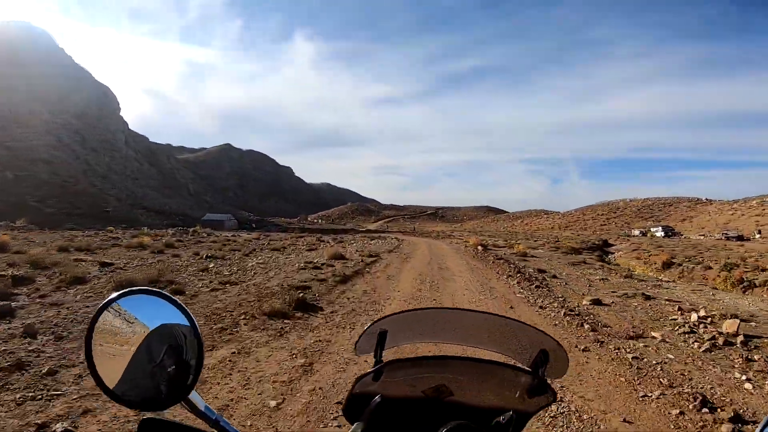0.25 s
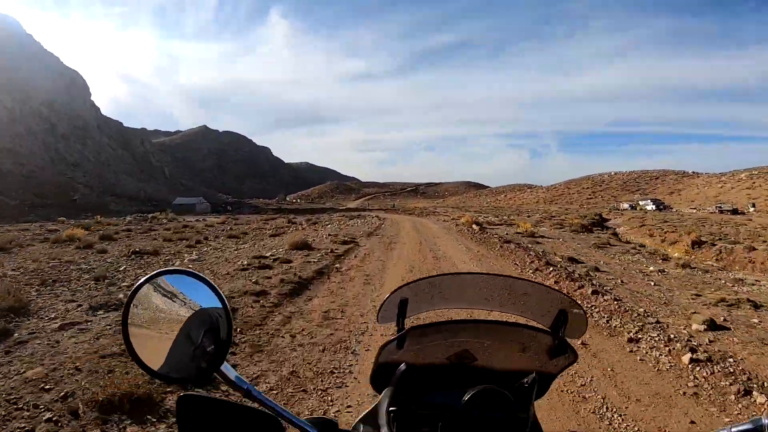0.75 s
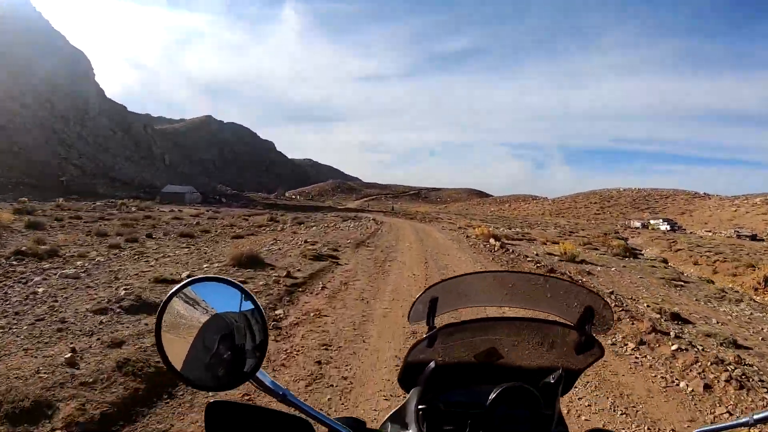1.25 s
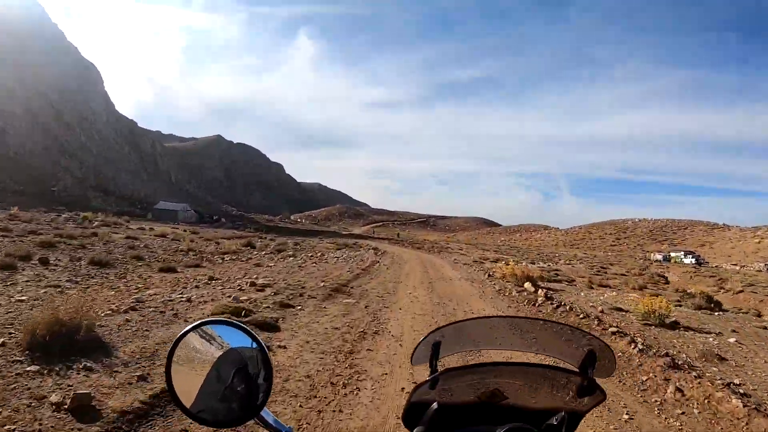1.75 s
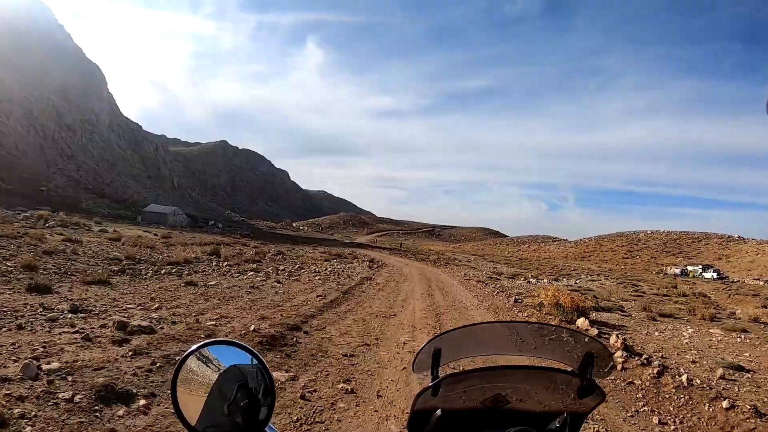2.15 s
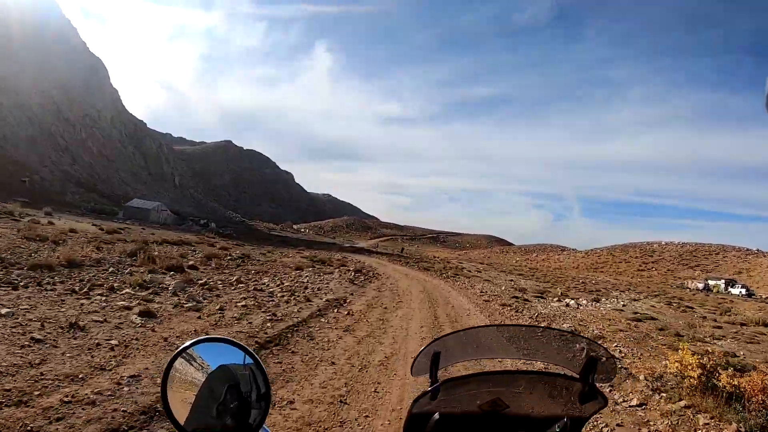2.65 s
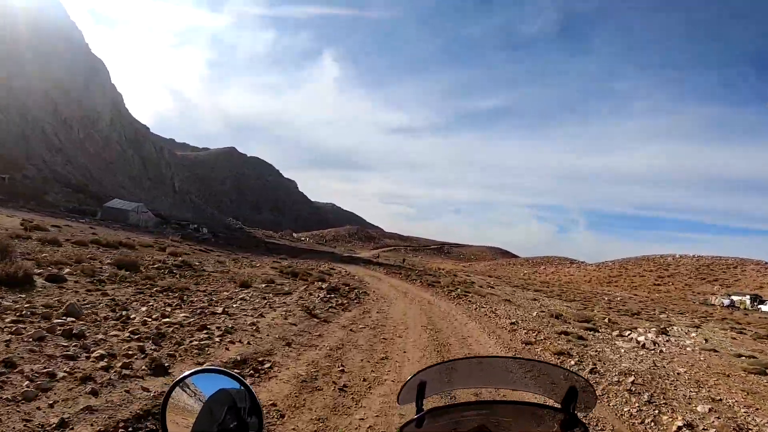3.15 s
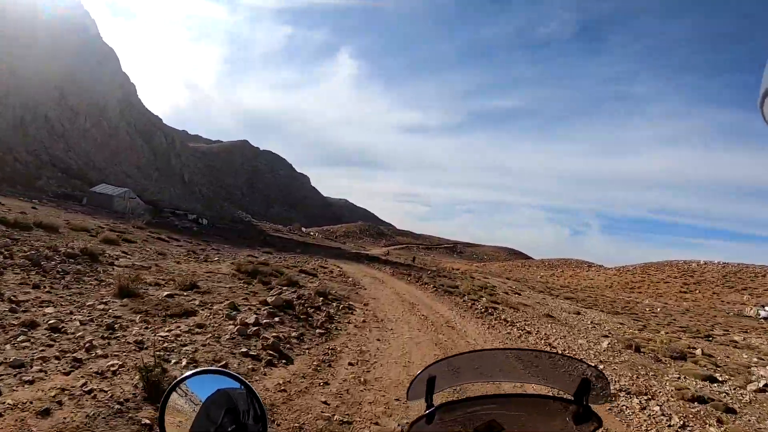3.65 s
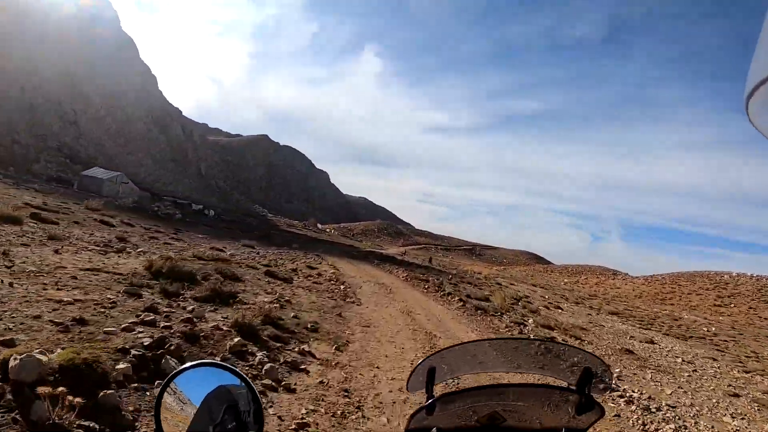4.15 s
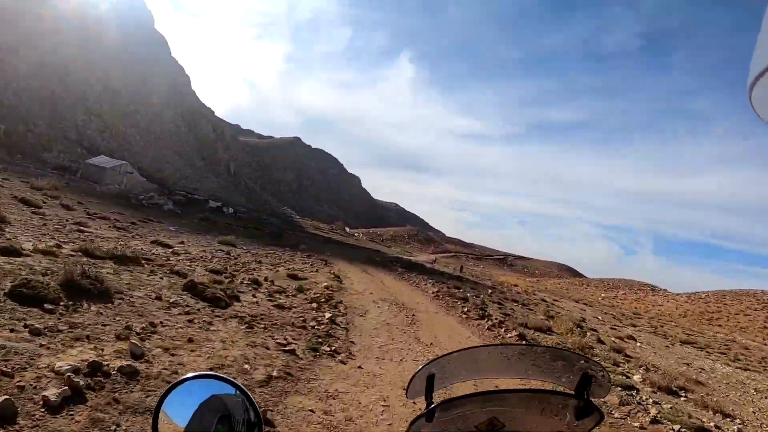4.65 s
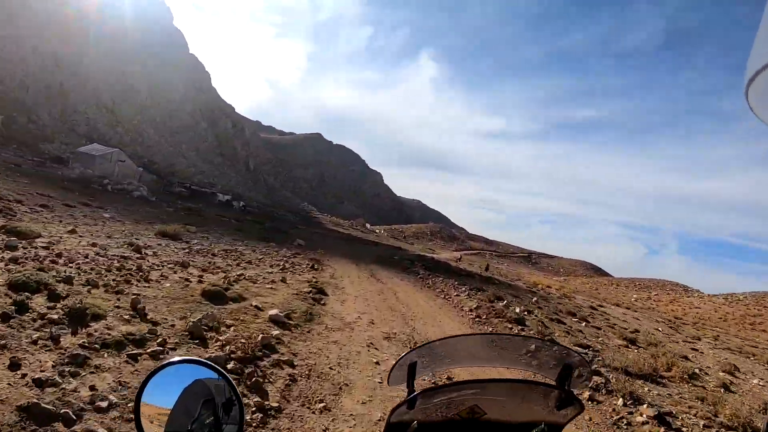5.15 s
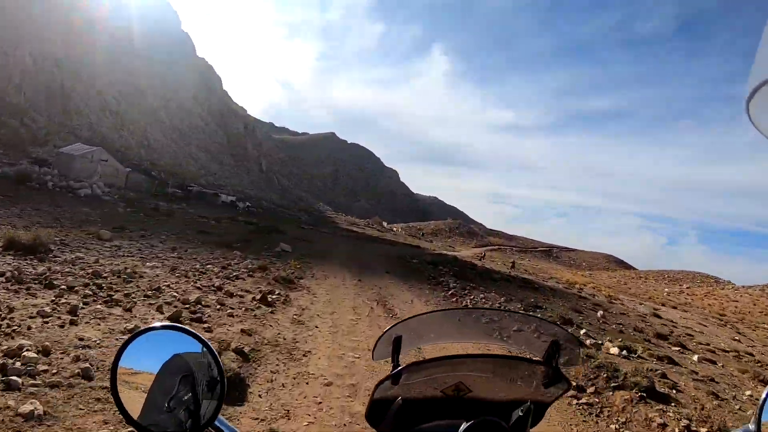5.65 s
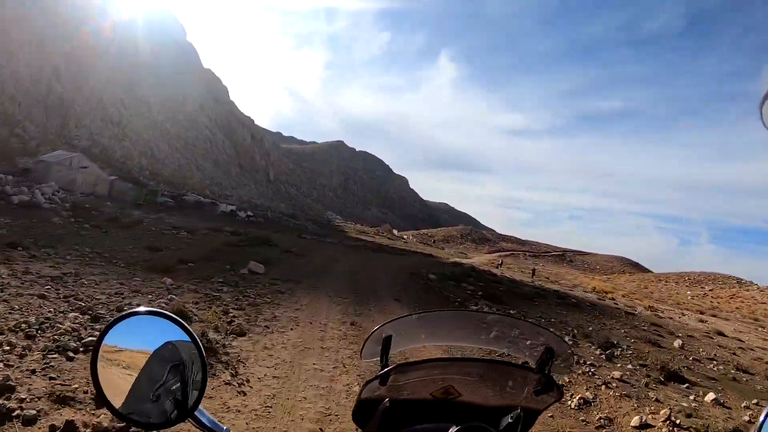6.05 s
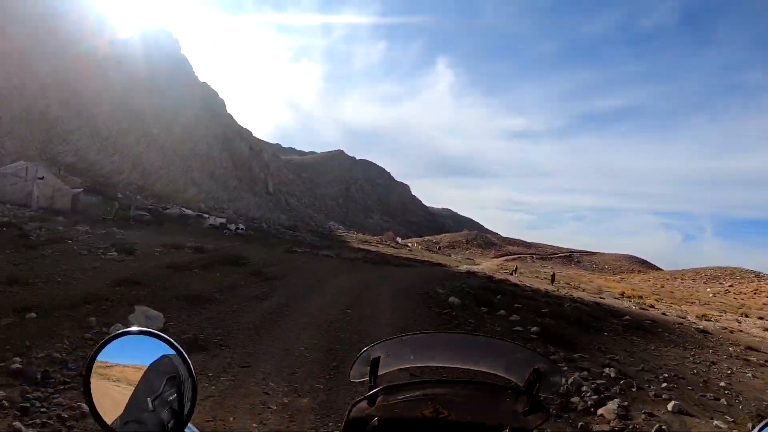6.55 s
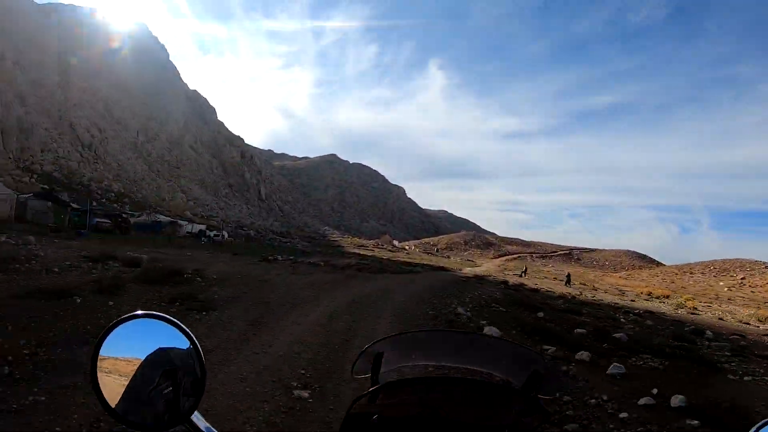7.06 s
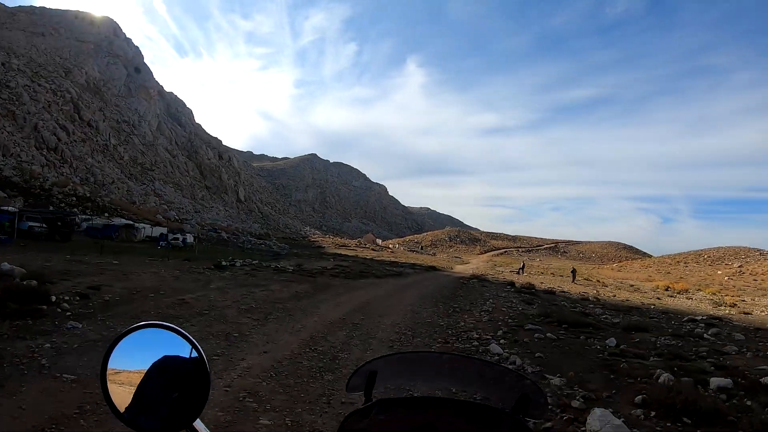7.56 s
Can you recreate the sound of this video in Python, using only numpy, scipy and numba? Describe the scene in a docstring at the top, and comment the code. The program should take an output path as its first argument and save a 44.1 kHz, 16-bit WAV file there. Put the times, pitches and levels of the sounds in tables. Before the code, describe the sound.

A motorcycle ridden on a rough stony track, heard from a microphone on the rider's body, dry and close in open air. Deep wind rumble and frame shudder run throughout, with faint gritty tyre hiss. From 0 to 0.5 s the engine drone drops in pitch, with a few dull ticks; from about 0.6 s throttle opens and the pitch climbs, growing a hoarse, pulsing exhaust bark, strongest around 2.2 s. Knocks begin near 1.3 s and cluster at 1.6 to 2.1. After 2.5 s the throttle closes and the engine falls to a low, steady throb by 3.1. A sharp bright crack hits at 3.0; hollow knocks, clicks and scraping clatter then crowd together, heaviest around 5.2 to 6.1 s. Rattling continues until 6.9, nearly clears around 7.0 to 7.3, leaving throb and small ticks, then returns in brief knocks at 7.4 to 7.7.

```python
"""Motorcycle on a stony track

A camera on a rider's chest as a motorcycle climbs a stony track in open country. The engine drones in
sine orders of its cycle, and each firing rings exhaust resonances. The camera mount knocks as damped swings,
among bright clicks and dull ticks; it clatters in bursts and longer stretches, dense grains over scraping noise.
Coloured noise makes the tyre hiss and the deep rumble of wind and frame shudder."""
import sys
import numpy as np
from scipy import signal
from scipy.fft import rfft, irfft, next_fast_len
from scipy.io import wavfile
from scipy.ndimage import uniform_filter1d
from numba import njit

SR = 44100
rng = np.random.default_rng(int(sys.argv[2]) if len(sys.argv) > 2 else 0)


def invert_db(level):
    """Linear amplitude ratio for a level in decibels (20 dB per decade), elementwise."""
    return 10 ** (np.asarray(level, dtype=float) / 20)


def unload_wav(signal):
    """Save mono or channel-first audio to the path in sys.argv[1] as 16-bit WAV at rate SR, clipped to [-1, 1]."""
    wavfile.write(
        sys.argv[1],
        SR,
        np.round(np.clip(np.atleast_2d(signal).T, -1, 1) * 32767).astype(np.int16),
    )


N = 344421
T = np.arange(N) / SR


def level(x, db):
    """Mean-square scaling: brings a signal to an rms level in dB."""
    return x * invert_db(db) / np.sqrt(np.mean(x ** 2))


def curves(table):
    """Linear interpolation: table columns against time, sample by sample."""
    s, *columns = np.transpose(table)
    return [np.interp(T, s, c) for c in columns]


def colour(x, points):
    """Minimum-phase filtering: a causal response to (Hz, dB) points, from the folded cepstrum."""
    size = next_fast_len(2 * SR)
    hz, db = np.transpose(points)
    f = np.maximum(np.arange(size // 2 + 1) * SR / size, 1)
    log_gain = np.interp(np.log(f), np.log(hz), db) * np.log(10) / 20
    cepstrum = irfft(log_gain, size)
    cepstrum[1:size // 2] *= 2
    cepstrum[size // 2 + 1:] = 0
    impulse = irfft(np.exp(rfft(cepstrum)), size)[:SR // 2]
    return signal.fftconvolve(x, impulse)[:N]


def ring(x, hz, width):
    """Resonance: a second-order band-pass with gain 1 at its centre."""
    return signal.lfilter(*signal.iirpeak(hz, hz / width, SR), x)


def lowpass(x, hz):
    """Steep low-pass: a third-order Butterworth response."""
    return signal.sosfilt(signal.butter(3, hz, fs=SR, output="sos"), x)


def walk(rate):
    """Slow random modulation: levels held 1 / rate seconds, slewed twice, with a spread of 1."""
    k = int(SR / rate)
    held = np.repeat(rng.standard_normal(N // k + 1), k)
    w = uniform_filter1d(uniform_filter1d(held, k), k)[:N]
    return w / w.std()


@njit
def grains(s, hz, cycles, size):
    """Damped free oscillation: swings that open with a pull on the diaphragm as the contact builds."""
    y = np.zeros(N)
    for e in range(len(s)):
        p = np.exp((2j * np.pi - 3 / cycles[e]) * hz[e] / SR)  # one sample of turning and decay
        z, gap, i = size[e] + 0j, 1., int(s[e] * SR)
        for k in range(i, min(N, i + int(2.5 * cycles[e] * SR / hz[e]))):
            y[k] -= z.imag * (1 - gap)
            z *= p
            gap *= np.exp(-9 * hz[e] / SR)  # the contact closes within a part of a swing
    return y


def engine():
    """Periodic excitation: steady low orders of the cycle, and one firing a cycle that excites resonances."""
    # Each row: time in seconds, engine cycle rate in Hz, 4th order in dB, 6th order in dB,
    # throttle as the nominal level of the exhaust bark in dB.
    revs = [(0, 24.3, -21, -32, -54), (.2, 21.7, -20, -40, -54), (.43, 17.1, -26, -29, -54),
            (.6, 17.2, -25, -25, -46), (.8, 18.3, -22, -21, -40), (1.05, 19.4, -22, -27, -39),
            (1.5, 21.95, -24, -32, -42), (1.85, 23.6, -29, -42, -37), (2.25, 24.9, -28, -44, -34),
            (2.42, 24.8, -26, -46, -38), (2.52, 24.9, -25, -46, -41), (2.76, 24.8, -26, -46, -50),
            (3.09, 18.6, -24, -46, -54), (3.4, 18.7, -24, -46, -54), (4.5, 17.8, -26, -40, -54),
            (5.15, 17.3, -28, -36, -54), (6.2, 16.9, -26, -31, -54), (6.85, 17.1, -30, -29, -53),
            (7.2, 17.3, -21, -27, -50), (7.81, 17.6, -32, -32, -52)]
    hz, db4, db6, bark_db = curves(revs)
    turn = np.cumsum(hz) / SR
    pull_db = np.minimum(bark_db + 44, 0)  # 0 under throttle, negative off it

    firing_s = 2.246  # a moment at which the exhaust fires
    cycle, phase = np.divmod(turn - turn[int(firing_s * SR)], 1)
    fired = np.flatnonzero(np.diff(cycle))
    strength_db = 1.3 * rng.standard_normal(len(fired))
    size = invert_db(strength_db[np.clip(cycle - cycle[0] - 1, 0, None).astype(int)])
    pulse = (np.exp(-phase / 0.3) + 0.25) * np.minimum(phase / 0.06, 1)
    puff = size * pulse * rng.standard_normal(N)

    bark = exhaust(hz, fired, puff, bark_db)
    # under load each firing also makes the mount tick
    tick = lowpass(ring(puff, 2400., 2000.), 4500.)
    return (drone(hz, turn, db4, db6, pull_db) + invert_db(bark_db) * level(bark, 0.27)
            + invert_db(pull_db) * level(tick, -56) + frame(hz, puff, pull_db))


def drone(hz, turn, db4, db6, pull_db):
    """Harmonic synthesis: sines at multiples of the cycle rate, wavering in level and phase."""
    # Orders that throttle brings out. Each row: multiple of the cycle rate,
    # level in dB under throttle at 20 cycles a second.
    orders = [(1, -17), (3, -31), (5, -29), (9, -32)]
    lines = [(4, db4), (6, db6)]
    for k, db in orders:
        lines.append((k, pull_db + db - abs(k - 4) * abs(hz - 20) / 2))
    total = 0
    for k, db in lines:
        gain = np.sqrt(2) * invert_db(db + walk(6))
        total = total + gain * np.sin(2 * np.pi * (k * turn + 0.025 * walk(5) + rng.random()))
    return total


def exhaust(hz, fired, puff, bark_db):
    """Pipe resonance: each firing starts a ring at each mode, and puffs of gas noise excite it too."""
    # Each row: resonance in Hz at 22 cycles a second, width in Hz, relative level in dB before the throttle tilt.
    pipe = [(470, 42, 3.5), (555, 60, 3.5), (680, 70, -11)]
    scatter, rise = 0.03, 0.005  # pitch spread as a share; pitch rise as a share per cycle a second
    bark = 0
    for f, width, db in pipe:
        pitch = f * (1 + scatter * rng.standard_normal(len(fired)) + rise * (hz[fired] - 22))
        chance = rng.standard_normal(len(fired))  # sets both delay and strength
        starts = fired / SR + 0.002 * np.abs(chance)
        rings = grains(starts, pitch, 3 * pitch / (np.pi * width), invert_db(1.6 * chance))
        gas = ring(ring(puff, f, 2 * width), f, 2 * width)
        # more throttle brings out the higher resonances
        tilt_db = 0.8 * (bark_db + 37.5) * min(np.log2(f / pipe[0][0]), 0.3)
        bark = bark + invert_db(db + tilt_db) * (level(ring(rings, f, 3 * width), -4) + level(gas, -2))
    return bark


def frame(hz, puff, pull_db):
    """Forced resonance: a frame part rings once a cycle, most at low revs."""
    part_hz, width_hz, loss_db = 1110, 130, 1.0  # loss per cycle a second above 14
    part = level(ring(ring(puff, part_hz, width_hz), part_hz, 2 * width_hz), -46)
    return invert_db(pull_db / 2 - loss_db * (hz - 14)) * part


def knocks():
    """Impact response: each blow swings and rings the housing, with a duller thud, bright edge and prior jolt."""
    # Knocks of the mount. Each row: time in seconds, nominal peak in dB, pitch in Hz,
    # bright edge in dB and thud in dB, both nominal against the peak.
    hits = [(1.307, -16.5, 810, -33, 0), (1.56, -16, 1060, -22, -5.5), (1.659, -12, 813, -26, -10),
            (1.774, -12, 1140, -5, -10), (2.076, -13.5, 915, -29, -11.5), (2.25, -16.5, 700, -23, -12),
            (2.601, -18, 1083, -40, -8), (2.805, -20, 886, -18.5, -7), (2.9, -16.5, 877, -27, 1),
            (2.926, -10, 995, -32, -1), (2.962, -22.5, 1060, -23, -4.5), (2.987, -8.5, 1670, 2.5, -7),
            (3.06, -21, 795, -6.5, -9.5), (3.308, -10, 923, -20.5, -6), (3.353, -15.5, 850, -17, -11),
            (3.374, -10.5, 788, -23.5, -21.5), (3.469, -19, 1100, -6.5, -4), (3.5, -15.5, 930, -29.5, -8.5),
            (3.595, -13.5, 995, -27, -6.5), (3.628, -18, 1090, -6, -7), (3.94, -25.5, 970, -11.5, -14),
            (3.957, -13, 1300, -27, -7.5), (4.031, -14.5, 1100, -37, -8.5), (4.124, -18.5, 923, -12, -4.5),
            (4.15, -16.5, 980, -31, -17), (4.265, -17.5, 860, -12.5, -5), (4.409, -16, 1044, -29, -14),
            (4.466, -18, 1030, -12.5, -5), (4.538, -11, 890, -29.5, -12), (4.604, -19, 890, -22, -2.5),
            (4.806, -21.5, 1100, -12.5, -8.5), (4.819, -13.5, 1470, -22, -6), (4.892, -19, 920, -28, -10.5),
            (5.015, -9.5, 833, -36, -18), (5.118, -11, 995, -22.5, -10.5), (5.233, -10, 1224, -26, -6),
            (5.271, -20, 1010, -21, 0.5), (5.284, -20.5, 1170, -4.5, -3), (5.313, -9, 1230, -24, -4.5),
            (5.368, -15, 1090, -30, -8.5), (5.441, -13.5, 1170, -1, -7.5), (5.479, -22, 1930, -3, 2),
            (5.497, -11.5, 1244, -19.5, -14), (5.565, -20, 1060, -18.5, -7), (5.62, -20.5, 970, -25, -6),
            (5.648, -16, 847, -24, -17), (5.694, -9.5, 1120, -34, -7), (5.794, -24, 1014, -18.5, -6.5),
            (5.832, -13, 802, -14, -15), (5.859, -14, 1150, -9, -11), (5.963, -19, 1340, -21.5, -7),
            (6.039, -11, 1920, -1, -12), (6.097, -22, 990, -4, -2), (6.269, -22, 1090, -8.5, -15),
            (6.423, -21.5, 996, -2.5, -9), (6.527, -14, 1090, -9, -10), (6.746, -15.5, 915, -28, -5),
            (6.878, -10.5, 1120, -33, -11), (6.94, -18.5, 910, -7.5, -16), (7.325, -22.5, 1150, -33, -28),
            (7.433, -22, 1180, -32, -21.5), (7.554, -18.5, 883, -24, -6), (7.569, -15.5, 825, -25.5, -11),
            (7.714, -16.5, 890, -14, -5.5)]
    s, db, hz, edge_db, thud_db = np.transpose(hits)
    e = rng.random((len(s), 4))
    swing = lowpass(grains(s, hz, 2.07 + 0 * s, invert_db(db + 4.0)), 3000.)
    tail = grains(s, hz * (0.74 + 1.03 * e[:, 2]), 7 + 0 * s, invert_db(db - 8.0))
    thud = grains(s, 250 + 300 * e[:, 0], 4.4 + 0 * s, invert_db(db + thud_db + 5.5))
    edge = grains(s, 2500 + 3500 * e[:, 1], 18.7 + 0 * s, invert_db(db + edge_db - 3.5))
    # the jolt that causes the blow starts 12 ms ahead of it
    jolt = grains(s - 0.012, 30 + 40 * e[:, 3], 0.59 + 0 * s, invert_db(db + 13.0))
    return swing + edge + lowpass(tail + thud + jolt, 3000.)


def clatter():
    """Stochastic impacts: dense ticks of the loose mount, each with its own pitch, scaled by the shaking."""
    shake_db, treble_db = shaking()
    shake = invert_db(shake_db)
    e = rng.random((18000, 4))
    # every contact rings three parts at once
    s = np.repeat(e[::3, 0], 3) * N / SR
    hz = 170 * (13000 / 170) ** e[:, 1]
    strength = invert_db(-3.0 * np.log(e[:, 2] + 0.026))
    ticks = grains(s, hz, 1 + 6.5 * e[:, 3] ** 2, strength * hz)
    # each contact chatters on through the housing for a moment, dying away over 1.7 ms
    blows = np.bincount((s * SR).astype(int), strength, N)
    chatter = rng.standard_normal(N) * signal.lfilter([1], [1, -np.exp(-1 / (0.0017 * SR))], blows)
    ticks = level(ticks, -1.5) + level(chatter, -4.0)
    # the ticks come in clumps, over a scraping noise that swells on its own
    clumps = level(ticks * invert_db(4.3 * np.minimum(walk(120), 1.5)), 0)
    scrape = rng.standard_normal(N) * invert_db(4.3 * np.minimum(walk(70), 1))
    # Spectrum of the mount. Each row: frequency in Hz, relative density in dB per Hz before the band split.
    spectrum = [(88, -20.5), (170, -1), (440, -10), (632, -12.5), (1600, -18.5), (2460, -22), (4000, -25),
                (6010, -36.5), (8370, -39.5), (15600, -51)]
    body = colour(clumps + level(scrape, -10.5), spectrum)
    low = signal.sosfilt(signal.butter(2, 1100., fs=SR, output="sos"), body)
    high = level(body - low, 8.94)
    treble = signal.sosfilt(signal.butter(3, 5500., "high", fs=SR, output="sos"), high)
    bright = shake * (high + (invert_db(treble_db) - 1) * treble)
    # the treble sizzles on around each burst; half a length of offset sets it apart from the ticks
    smooth_shake = uniform_filter1d(uniform_filter1d(shake, SR // 10), SR // 10)
    sizzle = smooth_shake * invert_db(-4.0) * np.roll(treble, N // 2)
    # light shaking is duller: the lows fade less than the highs
    return bright + sizzle + invert_db(0.76 * shake_db) * level(low, 4.66)


def shaking():
    """Exponential growth and decay: bursts add in power; their power-weighted mean sets the treble."""
    # Bursts and longer stretches of clatter. Each row: time in seconds, shaking in dB,
    # time to fall by die_away_db in seconds, treble in dB against the shaking.
    bursts = [(.03, -47.5, 0.094, -4), (1.1, -51, 0.54, 2), (1.506, -42, 0.06, 0), (1.676, -37, 0.089, 1.5),
              (1.799, -42.5, 0.14, -0.5), (1.938, -39.5, 0.042, 0.5), (2.083, -41, 0.056, -3.5),
              (2.598, -44, 0.024, -3), (2.8, -39.5, 0.14, 4), (2.909, -34.5, 0.051, 2),
              (2.995, -28, 0.049, 4), (3.183, -40, 0.039, 2.5), (3.318, -34, 0.034, -2),
              (3.369, -29, 0.033, 1.5), (3.508, -44, 0.13, -3.5), (3.6, -28, 0.017, -4),
              (3.638, -33, 0.046, 0), (3.876, -46, 0.027, -1), (3.951, -37.5, 0.054, 2),
              (4.037, -37, 0.019, -6.5), (4.115, -40, 0.059, 2), (4.161, -41.5, 0.05, 1),
              (4.27, -44, 0.053, -1), (4.405, -41.5, 0.094, -1.5), (4.553, -37.5, 0.079, 0),
              (4.62, -44, 0.099, -8), (4.767, -35.5, 0.013, 1), (4.837, -39, 0.091, -3),
              (5.019, -37, 0.035, -3.5), (5.126, -39.5, 0.087, -3), (5.244, -30.5, 0.028, -4.5),
              (5.289, -30, 0.031, 4.5), (5.309, -26, 0.028, 3), (5.443, -35.5, 0.019, -3.5),
              (5.491, -40, 0.19, 0.5), (5.641, -32.5, 0.017, 0), (5.707, -28, 0.038, 1),
              (5.815, -32, 0.038, -2), (5.88, -35, 0.06, 3), (5.908, -39.5, 0.013, 0),
              (5.973, -40, 0.047, 1), (6.046, -32.5, 0.035, 4), (6.136, -37.5, 0.049, 0),
              (6.29, -39.5, 0.041, 0), (6.457, -32.5, 0.046, -3.5), (6.532, -38, .04, 1),
              (6.575, -35, 0.0093, -3), (6.671, -41, 0.085, -1.5), (6.753, -36.5, 0.053, 1),
              (6.888, -41, 0.11, 2.5), (7.015, -50, 0.02, -2), (7.586, -35, 0.068, 4.5),
              (7.762, -38, 0.078, 1)]
    rest_db, die_away_db = -61.5, 20  # resting tremor; fall that counts as dying away
    rise_share = 0.83  # build-up time as a share of the dying time
    power, bright = invert_db(2 * rest_db), 0
    for s, db, fall_s, treble_db in bursts:
        away = np.where(T < s, (s - T) / rise_share, T - s) / fall_s
        burst = invert_db(2 * np.maximum(db - die_away_db * away, -120))
        power = power + burst
        bright = bright + burst * treble_db
    return 10 * np.log10(power), bright / power


def clicks():
    """Two-mode impact: each click, of a buckle or thrown grit, rings at its pitch and at a higher one."""
    # Each row: time in seconds, nominal peak in dB, pitch in Hz.
    bright_clicks = [(1.6616, -21, 4660), (1.6859, -20.5, 2650), (1.7007, -18.5, 2810),
                     (1.797, -21.5, 2820), (2.084, -29, 2890), (2.793, -21, 2930), (2.816, -19, 3150),
                     (2.885, -21, 2820), (2.9065, -30, 2470), (2.9865, -8.5, 3650), (3.301, -26, 2950),
                     (3.3285, -21.5, 2840), (3.354, -17, 2960), (3.3735, -17.5, 2830), (3.5903, -26, 3600),
                     (3.6273, -23, 3060), (3.729, -22.5, 2760), (3.4205, -31.5, 2800),
                     (3.5133, -28.5, 2710), (3.5995, -23, 2600), (3.645, -24.5, 2600),
                     (4.1496, -26.5, 2570), (4.4, -28.5, 2900), (4.475, -25, 2490), (4.5667, -21.5, 2930),
                     (4.806, -27, 2820), (4.822, -20.5, 2720), (4.8665, -20.5, 2450), (5.0152, -26.5, 3140),
                     (5.0336, -20.5, 3170), (5.1157, -24, 2660), (5.23, -23, 2450), (5.2862, -20, 2950),
                     (5.3105, -15.5, 2820), (5.4395, -26, 3000), (5.4782, -22, 3600), (5.2418, -26.5, 3540),
                     (5.805, -25, 4020), (5.8677, -21.5, 3370), (5.892, -16, 3840), (5.9983, -29, 2800),
                     (6.0307, -27.5, 2660), (6.039, -16.5, 3750), (6.048, -15, 3700), (6.145, -26.5, 2160),
                     (6.2015, -25, 2960), (6.2899, -34, 4200), (6.446, -19, 2700), (6.525, -27, 3080),
                     (6.5727, -20, 3050), (6.6757, -16.5, 2780), (6.746, -23, 2930), (6.791, -25.5, 2850),
                     (7.011, -29, 2570), (7.5797, -24, 2880), (7.727, -22, 2840), (7.7685, -22, 3220)]
    s, db, hz = np.transpose(bright_clicks)
    upper_hz = hz * (1.1 + 2.1 * rng.random(len(s)))
    lower = grains(s, hz, 5.1 + 0 * s, invert_db(db + 3.5))
    upper = grains(s, upper_hz, 11.0 + 0 * s, invert_db(db - 31.0))
    return lower + upper


def dull_ticks():
    """Heavy damping: short dull ticks at listed times, some in step with the engine's firings, others at random."""
    # Each row: time in seconds, nominal peak in dB.
    tick_times = [(0.063, -24), (0.184, -24.5), (0.235, -25), (0.295, -25.5), (0.693, -30.5), (1.044, -22),
                  (1.096, -21.5), (1.147, -24), (2.125, -24), (2.518, -24.5), (2.553, -25.5),
                  (2.676, -28.5), (2.848, -27), (3.106, -26.5), (4.759, -26), (4.932, -27), (5.378, -24),
                  (5.542, -22), (5.764, -20.5), (5.945, -25.5), (6.212, -30.5), (6.979, -34.5),
                  (7.015, -25.5), (7.021, -22.5), (7.151, -28.5), (7.179, -36), (7.223, -33)]
    strays_per_s, weakest_db, range_db = 5.7, -30.5, 13.0  # of the random ticks, before the low-pass
    e = rng.random((int(strays_per_s * N / SR), 3))
    stray_db = weakest_db + range_db * e[:, 2]
    stray = grains(e[:, 0] * N / SR, 800 + 900 * e[:, 1], 1.8 + 0 * e[:, 1], invert_db(stray_db))
    s, db = np.transpose(tick_times)
    listed = grains(s, 900 + 500 * rng.random(len(s)), 2.56 + 0 * s, invert_db(db + 7.0))
    return lowpass(stray + listed, 2600.)


def tyres():
    """Rolling noise: coloured hiss, its level modulated as grit crunches under the tread."""
    # Each row: frequency in Hz, relative density in dB per Hz.
    spectrum = [(90, -12.5), (170, -1.5), (230, -9), (320, -14.5), (530, -10.5), (860, -13), (1100, -11.5),
                (1600, -25), (3200, -30), (5000, -41), (7000, -52), (11000, -55.5), (15600, -90.5)]
    grit = invert_db(3 * walk(110) + 1.2 * walk(12))
    return level(colour(rng.standard_normal(N) * grit, spectrum), -40.5)


def wind():
    """Turbulent pressure: deep noise of wind and frame shudder, with a fluttering band above it."""
    # Each row: time in seconds, rumble level in dB before the random gusts.
    strength = [(0, -9.5), (.7, -15.5), (1.4, -12.5), (2.2, -12.5), (2.8, -13), (3.7, -15), (4.3, -11.5),
                (4.6, -13.5), (5.3, -11), (5.9, -16), (6.6, -11.5), (7.2, -14.5), (7.81, -12)]
    # Each row: frequency in Hz, relative density in dB per Hz.
    spectrum = [(3, -38), (7, -22), (12, -1.5), (16, -0.5), (21, 3), (27, -5), (36, -7.5), (50, -15.5),
                (90, -19.5), (170, -27), (400, -45), (900, -86), (16000, -101)]
    gusts_per_s, gust_db = 7, 1.0
    deep = level(colour(rng.standard_normal(N), spectrum), 0)
    band = signal.butter(2, [110., 320.], "band", fs=SR, output="sos")
    flutter = signal.sosfilt(band, rng.standard_normal(N)) * invert_db(4.5 * walk(22))
    deep_db = curves(strength)[0] + gust_db * walk(gusts_per_s)
    return invert_db(deep_db) * deep + level(flutter, -41.5)


def scene():
    """Superposition: the pressures of all sources add at one microphone in the open."""
    return (engine() + knocks() + clatter() + clicks() + dull_ticks() + tyres() + wind())[None]


def low_pass(x):
    """Removes everything above the highest recorded frequency."""
    return signal.sosfilt(signal.butter(12, 15730, fs=SR, output="sos"), x)


def record(dry):
    """Asymmetric saturation: the preamplifier rounds the big swings, the upward ones sooner."""
    rounded = np.tanh(1.06 * dry + 0.3)
    mix = rounded - rounded.mean()
    return low_pass(mix)


dry = scene()
out = record(dry)
unload_wav(out)
```